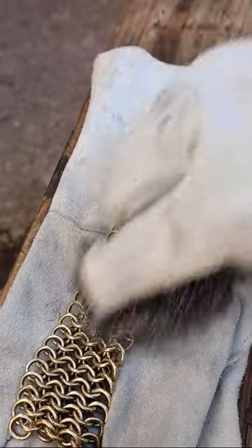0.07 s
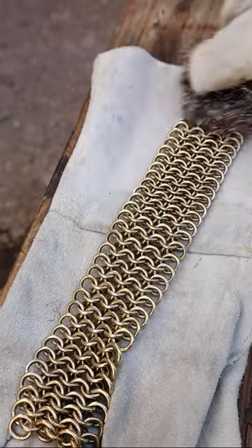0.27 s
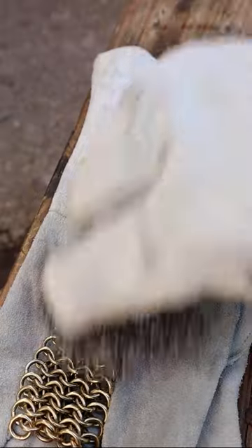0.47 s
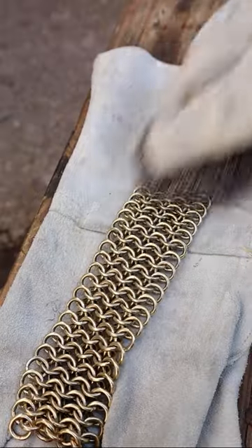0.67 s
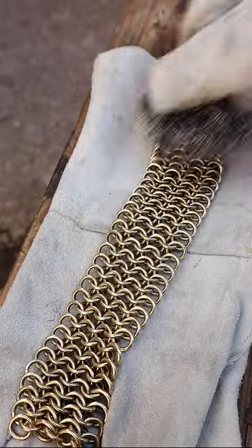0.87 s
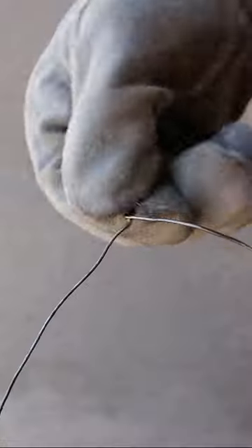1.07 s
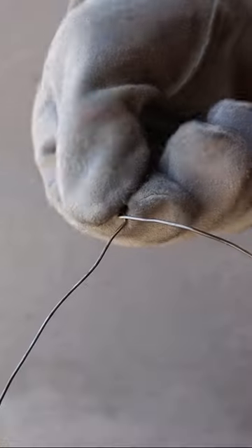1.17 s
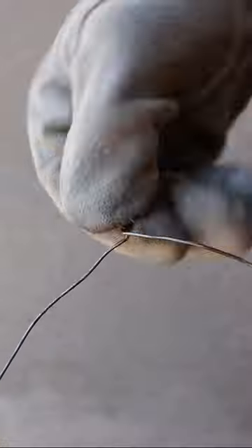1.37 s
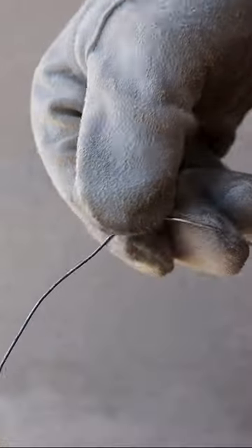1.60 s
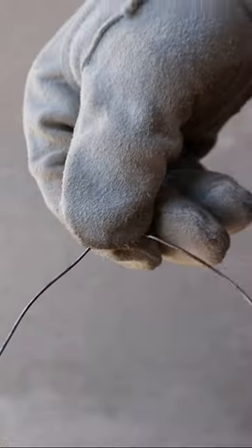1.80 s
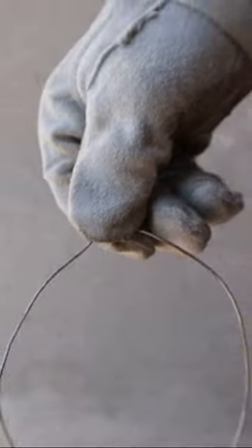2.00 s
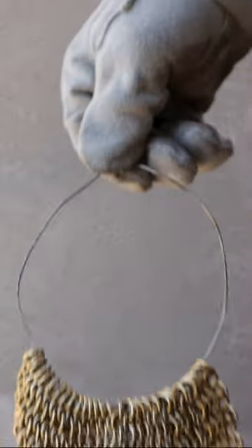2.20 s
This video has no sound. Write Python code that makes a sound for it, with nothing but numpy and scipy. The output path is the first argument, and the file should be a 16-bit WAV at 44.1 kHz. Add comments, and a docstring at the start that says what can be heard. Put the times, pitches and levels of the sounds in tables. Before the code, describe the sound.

Heard close in a quiet room, two quick brush strokes rasp over small clinking chainmail links. The sound switches suddenly to soft leather glove rubs and bumps, with a wire sliding, ticking and finally giving one sharp click.

```python
"""A quiet room, close up. A bristle brush sweeps twice along a strip of chainmail lying on leather:
bristles flick over the links, which clack together and settle with a thin ring. An abrupt cut leads
to a second scene, a gloved hand working a thin wire. The leather rubs and bumps softly; the wire
slides, ticks, squeaks faintly and scrapes, then rings with one sharp click."""
import sys
import numpy as np
from scipy import signal
from scipy.fft import rfft, irfft
from scipy.io import wavfile
from scipy.ndimage import uniform_filter1d

SR = 44100
rng = np.random.default_rng(int(sys.argv[2]) if len(sys.argv) > 2 else 0)


def waveform_to_disk(signal):
    """Save audio, clipped to [-1, 1], as 16-bit WAV at the path in sys.argv[1]."""
    frames = np.transpose(np.atleast_2d(signal))
    scaled = np.clip(frames, -1, 1) * 32767
    samples = np.round(scaled).astype(np.int16)
    wavfile.write(sys.argv[1], SR, samples)


N = 99225
ROOM_T60_S = 0.15

def undb(db):
    """Decibels to gain."""
    return 10 ** (np.asarray(db) / 20)

def unit(x):
    """Scale to rms 1."""
    return x / np.sqrt(np.mean(x ** 2) + 1e-30)

def curve(t, rows):
    """Straight lines through (time, value) rows."""
    return np.interp(t, *np.array(rows).T)

def bell(t, centre_s, width_s):
    """Smooth swell and fade around a moment."""
    return np.exp(-((t - centre_s) / width_s) ** 2 / 2)

def decay(age, t60):
    """Fade by 60 dB every t60 seconds."""
    return np.exp(-np.log(1000) * age / t60)

def ring(age, hz, t60):
    """One struck, dying mode."""
    return np.sin(2 * np.pi * hz * age) * decay(age, t60)

def pan(db):
    """Stereo gains for a left-minus-right level difference."""
    return undb(np.array([[db], [-db]]) / 2)

def over_hz(rows):
    """Spread (frequency, value) rows over the FFT bins."""
    hz, value = np.array(rows).T
    return np.interp(np.log(np.arange(N // 2 + 1) * SR / N + 1), np.log(hz), value)

def colour(x, eq):
    """Causal EQ from (frequency [Hz], gain [dB]) rows; rms 1."""
    cepstrum = irfft(np.log(undb(over_hz(eq))), N)
    cepstrum[N // 2:] = 0
    return unit(irfft(rfft(x) * np.exp(2 * rfft(cepstrum)), N))

def wide(eq, image):
    """Coloured stereo noise; image rows are (frequency [Hz], left-right correlation)."""
    alike = np.clip(over_hz(image), -1, 1)
    mid, side = (irfft(rfft(rng.standard_normal(N)) * np.sqrt(1 + s * alike), N) for s in (1, -1))
    return colour(np.array([mid + side, mid - side]), eq)

def grains(per_s, spread_db):
    """Random tiny impacts, mostly weak and a few strong; rms 1."""
    size = undb(spread_db * np.minimum(rng.exponential(size=N), 4.5))
    return unit((rng.random(N) < per_s / SR) * size * rng.choice([-1, 1], N))

def contacts(t, rows, grit, grit_t60, crack_eq):
    """Each contact is a short ring and a sharp crack that trails off in grit."""
    rings, cracks = np.zeros((2, N))
    noise = rng.standard_normal(N)
    for start, db, hz, t60, crack in rows:
        age = np.maximum(t - start, 0)
        rings += undb(db) * ring(age, hz, t60)
        trail = grit * noise * (t > start) * decay(age, grit_t60)
        cracks += undb(db) * crack * (np.sinc((t - start) * SR) + trail)
    response = colour(1. * (t == 0), crack_eq)
    return rings + signal.fftconvolve(cracks, response / np.abs(response).max())[:N]

def reverb(x, t, db):
    """Diffuse tail of a small room, different on each side."""
    tail = colour(rng.standard_normal((2, N)), [(100, 8.5), (4000, -1.5), (15000, 1.5)])
    tail *= decay(t, ROOM_T60_S) * (t > .004)
    return undb(db) * signal.fftconvolve(x[None], unit(tail) / np.sqrt(N), axes=1)[:, :N]

# Room tone under each scene (frequency [Hz], gain [dB])
BRUSH_AIR_EQ = [(25, -18), (100, -3), (230, 2.5), (500, -3), (1200, -4.5), (3000, -10.5),
                (9000, -12), (15500, -17)]
WIRE_AIR_EQ = [(25, -21), (100, -2), (250, -1), (500, -8.5), (1300, -11.5), (2300, -19.5),
               (6000, -21), (15500, -28)]
# Stereo image of the air, also used for the sliding wire (frequency [Hz], left-right correlation)
AIR_IMAGE = [(50, 1), (300, 0.12), (1400, 0.38), (6000, 0.06)]

def room_air():
    """Two soft beds of air, one for each scene."""
    return undb(-66) * wide(BRUSH_AIR_EQ, AIR_IMAGE), undb(-60.5) * wide(WIRE_AIR_EQ, AIR_IMAGE)

# Tone of the links at the strip's near end, stirred or brushed (frequency [Hz], gain [dB])
NEAR_LINKS_EQ = [(40, -57), (120, -21.5), (290, -13.5), (600, -9.5), (1120, -2), (1500, -4), (2100, -8),
                 (3500, -13.5), (6000, -20), (9500, -20.5), (15500, -30)]

def stray_links(t):
    """Loose links shift in a faint, sparse crackle."""
    return undb(-73.5) * colour(grains(600, spread_db=4), NEAR_LINKS_EQ) * (t > .06)

# Single link hits (time [s], level [dB], pitch [Hz], t60 [s], crack amount)
LINK_HITS = [(.076, -53, 1100, .008, .2), (.0835, -47, 1300, .009, 1.3), (.1805, -35, 1120, .007, .1),
             (.1895, -35, 1200, .01, .2), (.2168, -27, 1170, .007, .1), (.2852, -28, 1700, .004, .6),
             (.320, -38, 1700, .01, .4), (.3426, -39, 3100, .003, 2.1), (.3438, -45, 2600, .003, 1.6),
             (.378, -49, 1800, .006, .7), (.490, -55, 1720, .018, .6), (.554, -50, 1250, .01, .6),
             (.6048, -47, 2100, .006, 1.1), (.6064, -48, 1450, .008, .4), (.7505, -33, 2000, .008, .4),
             (.817, -31, 2150, .018, .3), (.8275, -34, 2200, .005, .6), (.856, -41, 3200, .003, 1.1),
             (.8848, -28, 2100, .0015, .7)]

def link_clacks(t):
    """Links knock together; being small, they radiate little low end."""
    clacks = contacts(t, LINK_HITS, grit=0.12, grit_t60=0.0093,
                      crack_eq=[(200, -29), (1800, 8), (4500, 4), (8000, -4), (15000, -11.5)])
    return signal.sosfilt(signal.butter(4, 720, "high", fs=SR, output="sos"), clacks) * pan(-2)

# Brush sweeps (start [s], attack [s], hold [s], release [s], level [dB])
SWEEPS = [(0.115, 0.085, 0.093, 0.063, -41.5), (0.646, 0.082, 0.095, 0.061, -41.5)]
# Brighter tone of the links at the far end (frequency [Hz], gain [dB])
FAR_LINKS_EQ = [(40, -50), (120, -25), (290, -16), (600, -19), (850, -13.5), (1120, -2.5), (1500, -4),
                (2100, -2.5), (3500, -8), (6000, -13.5), (9500, -18), (15500, -30.5)]
# Swish: leather rubbing low, bristle tips hissing high (frequency [Hz], gain [dB])
SWISH_EQ = [(100, -22), (330, 8), (500, 4), (1000, -6), (2800, -11), (4300, -3), (5600, -3.5), (9500, -4.5),
            (12000, -9), (15500, -20)]
NEAR_PAN_DB, FAR_PAN_DB = 1, -4

def brush_strokes(t, swell_db=18.5, lean_db=2.5, catch_db=2, catch_s=0.0033):
    """Bristles flick over the links, brighter and further right as each stroke travels."""
    out = np.zeros((2, N))
    for start, attack, hold, release, db in SWEEPS:
        end = start + attack + hold + release
        rise = np.maximum(1 - (t - start) / attack, 0)
        fall = np.maximum(1 + (t - end) / release, 0)
        pressure = undb(-swell_db * (rise ** 1.26 + fall))
        travel = np.clip((t - start - .07) / (end - start - .12), 0, 1)
        near, far = (colour(grains(4500, spread_db=3.5), eq) for eq in (NEAR_LINKS_EQ, FAR_LINKS_EQ))
        links = np.sqrt(1 - travel) * near * pan(NEAR_PAN_DB) + np.sqrt(travel) * far * pan(FAR_PAN_DB)
        speed = np.exp(-((t - start - 0.58 * (end - start)) / 0.067) ** 2)
        shared, left, right = (grains(12000, spread_db=4) for _ in range(3))
        # The swish flutters as the tips catch on link after link.
        flutter = undb(catch_db * unit(uniform_filter1d(rng.standard_normal(N), int(catch_s * SR))))
        swish = colour(flutter * (shared + 0.38 * np.array([left, right])), SWISH_EQ)
        swish *= undb(-8) * speed ** 1.6 * np.sqrt(pressure) * pan(1.5)
        lean = undb(db + lean_db * (travel - 1))  # the hand presses harder along the stroke
        out += lean * (pressure * links + swish)
    return out

def settling_links(t, end, modes_hz=(1650, 2200, 2570), jingle_hz=7900, bend=0.035):
    """Freed links slide back and chime; a thin jingle bends up in pitch as it swells."""
    slide = grains(9000, spread_db=2.5)
    rustle = undb(-60.5) * colour(slide, FAR_LINKS_EQ) * bell(t, end + 0.02, 0.043)
    modes = sum(ring(t, hz, t60=0.014) for hz in modes_hz)
    chime = undb(-64.5) * unit(signal.fftconvolve(slide, modes)[:N]) * bell(t, end + 0.049, 0.021)
    crest = end + 0.069
    swell = bell(t, crest, 0.021)
    linger = (t > crest) * np.exp(-np.abs(t - crest) / 0.044)
    jingle = unit(signal.fftconvolve(grains(3000, spread_db=6), ring(t, jingle_hz, t60=0.012))[:N])
    jingle = np.interp(t + bend * np.cumsum(swell) / SR, t, jingle) * np.maximum(swell, linger)
    fizz = 1.43 * swell * colour(grains(5300, spread_db=6.5), [(4000, -31), (8500, 1), (15500, 0)])
    return (rustle + chime) * pan(FAR_PAN_DB) + undb(-63.5) * (jingle + fizz)

# The chainmail reaches the right side slightly late (frequency [Hz], phase lag [rad])
RIGHT_LAG = [(1300, 0), (3900, 0.76), (5700, 1.63), (10000, 1.56), (13000, 3)]

def chainmail(t):
    """The links stir, clack, rasp under the brush and settle after each stroke, in a light reverb."""
    out = stray_links(t) + link_clacks(t) + brush_strokes(t)
    for start, attack, hold, release, _ in SWEEPS:
        out += settling_links(t, end=start + attack + hold + release)
    out[1] = irfft(rfft(out[1]) * np.exp(-1j * over_hz(RIGHT_LAG)), N)
    return out + reverb(out.mean(axis=0), t, db=-15)

# Effort of the gloved hand (time [s], level [dB])
HAND_EFFORT = [(.958, -53), (.975, -50.5), (1.065, -50.5), (1.124, -58), (1.32, -59.5), (1.368, -48.5),
               (1.49, -49), (1.534, -55), (1.61, -51), (1.66, -46), (1.736, -55.5), (1.82, -48),
               (1.865, -55.5), (2.066, -64), (2.25, -66)]
# Dull tone of the glove (frequency [Hz], gain [dB])
GLOVE_EQ = [(20, -9), (45, -4.5), (100, -1.5), (140, -5), (200, -4.5), (300, -6.5), (450, -14.5),
            (800, -20), (1500, -40.5), (4000, -50), (15000, -59)]
# Centred lows, wider above (frequency [Hz], left-right correlation)
GLOVE_IMAGE = [(50, 1), (130, 0.52), (290, 0.1)]

def glove_rub(t):
    """Leather rubs, low and soft, rising with the hand's effort."""
    return wide(GLOVE_EQ, GLOVE_IMAGE) * undb(curve(t, HAND_EFFORT))

# Midrange hiss of wire on leather (frequency [Hz], gain [dB])
SLIDE_EQ = [(100, -11), (400, -1), (900, 2.5), (1620, 1.2), (2100, -5.5), (4000, -13.5), (9000, -21.5),
            (15500, -31)]
# Its fader ride (time [s], level [dB])
SLIDE_RIDE = [(.958, -61.5), (1.1, -59.5), (1.3, -64.5), (1.8, -67.5), (2.05, -76), (2.25, -70.5)]

def wire_slide(t):
    """The wire hisses as it slides through the glove."""
    return wide(SLIDE_EQ, AIR_IMAGE) * undb(curve(t, SLIDE_RIDE))

# Small wire hits (time [s], level [dB], pitch [Hz], t60 [s], crack amount)
WIRE_HITS = [(1.028, -52, 7440, .003, 0.9), (1.097, -51, 10700, 0.0045, 1.84),
             (1.3486, -53, 1600, 0.02, .1), (1.7252, -39.5, 2150, 0.0018, 0.12),
             (1.91, -55, 8130, 0.0097, 0.69)]

def wire_ticks(t):
    """The worked wire gives tiny pings with gritty tails."""
    return contacts(t, WIRE_HITS, grit=0.29, grit_t60=0.046,
                    crack_eq=[(300, -3), (1500, 2), (6000, 2.5), (15000, -1.5)])

# Soft thuds of the glove (time [s], level [dB], pitch [Hz])
GLOVE_THUDS = [(1.042, -40.5, 67.8), (1.160, -42, 131), (1.456, -45, 123), (1.476, -46.5, 84),
               (1.656, -40, 98), (1.658, -42.5, 202), (1.69, -44, 73)]

def glove_bumps(t, rise_cycles=0.54):
    """Each bump of the glove is a low tone that swells and dies in a few cycles."""
    out = np.zeros(N)
    for start, db, hz in GLOVE_THUDS:
        cycles = np.maximum(t - start, 0) * hz
        swell = cycles / rise_cycles
        out += undb(db) * np.sin(2 * np.pi * cycles) * swell * np.exp(1 - swell)
    return out

# Glide of the squeak (time [s], pitch [Hz])
SQUEAK_GLIDE = [(1.24, 1330), (1.305, 1650), (1.36, 1570)]

def wire_squeak(t, roughness=.025):
    """The wire slips in the leather with a faint, wavering tone."""
    start, end = SQUEAK_GLIDE[0][0], SQUEAK_GLIDE[-1][0]
    slip = np.clip((t - start) / (end - start), 0, 1)
    waver = unit(uniform_filter1d(rng.standard_normal(N), size=200))
    hz = curve(t, SQUEAK_GLIDE) * (1 + roughness * waver)
    return undb(-68.5) * np.sin(np.pi * slip) * np.sin(2 * np.pi * np.cumsum(hz) / SR)

def wire_scrape(t):
    """The wire scrapes thinly just before the click."""
    grit = colour(grains(15000, spread_db=5), [(3000, -25), (6000, -10), (8200, -2), (15500, -17)])
    return undb(-71) * grit * bell(t, centre_s=1.895, width_s=0.045)

# Ringing partials of the wire (frequency [Hz], relative level [dB])
WIRE_PARTIALS = [(1150, -5), (3800, 4), (4850, -4), (5400, -5), (6400, -4)]

def wire_click(t, start=1.9686, rasp_s=.0025, t60=0.02):
    """One sharp, rasping click rings the wire and lingers in the room."""
    age = np.maximum(t - start, 0)
    modes = sum(undb(db) * ring(age, hz, t60) for hz, db in WIRE_PARTIALS) / 2
    crack = wide(eq=[(300, -13), (1200, 0), (2800, -6), (4200, 3), (6600, -4.5), (8000, -12),
                     (15000, -22)], image=[(1000, 0.63), (10000, 0.46)])
    burst = decay(np.maximum(age - rasp_s, 0), t60)
    tail = 0.31 * decay(age, ROOM_T60_S)
    crack *= (t > start) * np.maximum(burst, tail)
    return undb(-44.5) * (modes + 0.52 * crack)

CUT_S, CROSSFADE_S = .957, .003

def scene():
    """The brushing cuts to the wire work, each over its own room air."""
    t = np.arange(N) / SR
    brush_air, wire_air = room_air()
    brushing = chainmail(t) + brush_air
    ticks, click = wire_ticks(t), wire_click(t)
    wire = wire_slide(t) + ticks + wire_squeak(t) + wire_scrape(t) + click
    wire += reverb(ticks + click.mean(axis=0), t, db=-8)
    wire_work = (glove_rub(t) + glove_bumps(t) + wire + wire_air) * pan(-0.9)
    cut = np.clip((t - CUT_S) / CROSSFADE_S, 0, 1)
    return (1 - cut) * brushing + cut * wire_work

def record(dry):
    """A steep low-pass trims the very top."""
    return signal.sosfilt(signal.ellip(10, .1, 80, 15750, fs=SR, output="sos"), dry)

dry = scene()
out = record(dry)
waveform_to_disk(out)
```